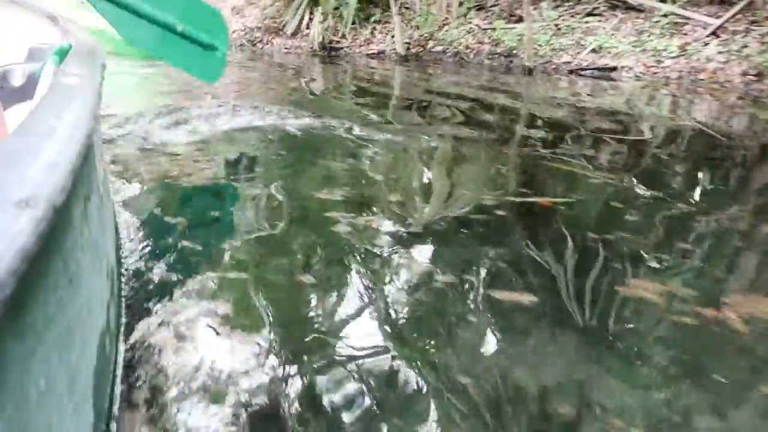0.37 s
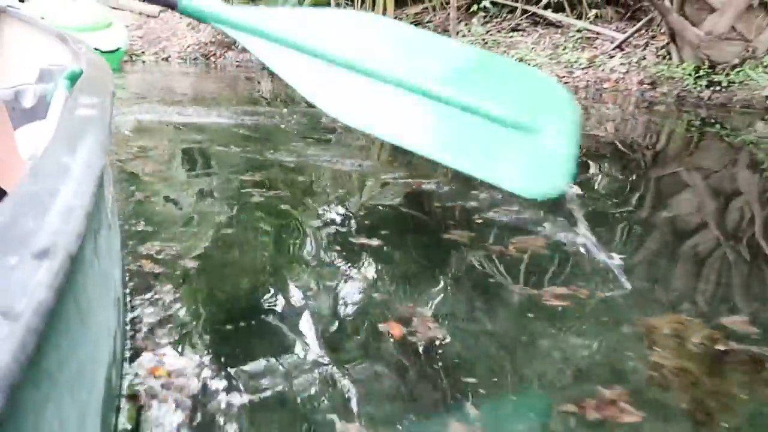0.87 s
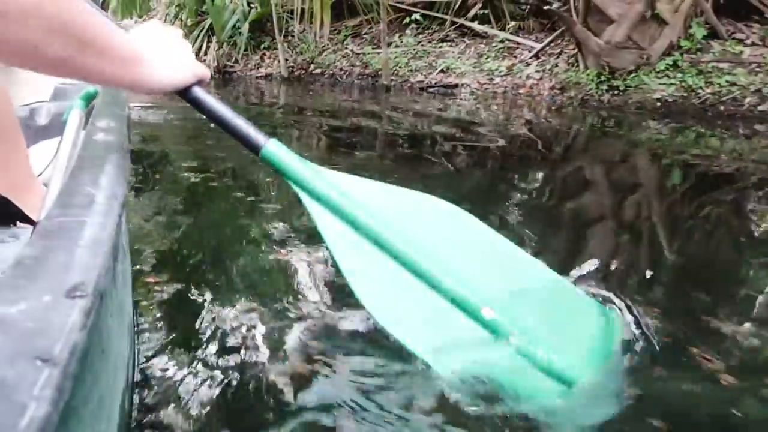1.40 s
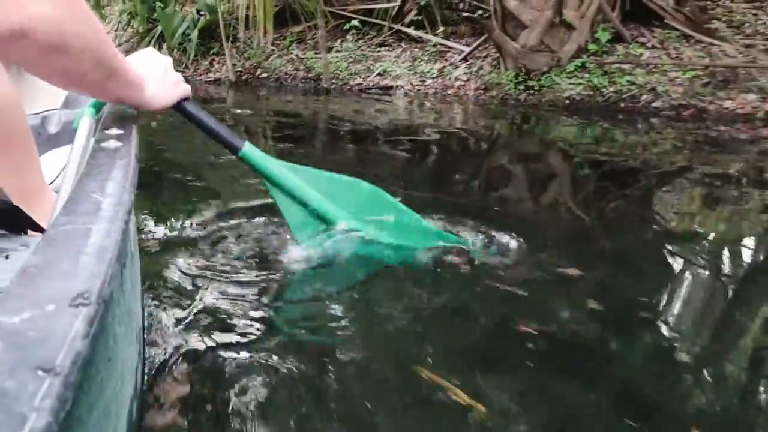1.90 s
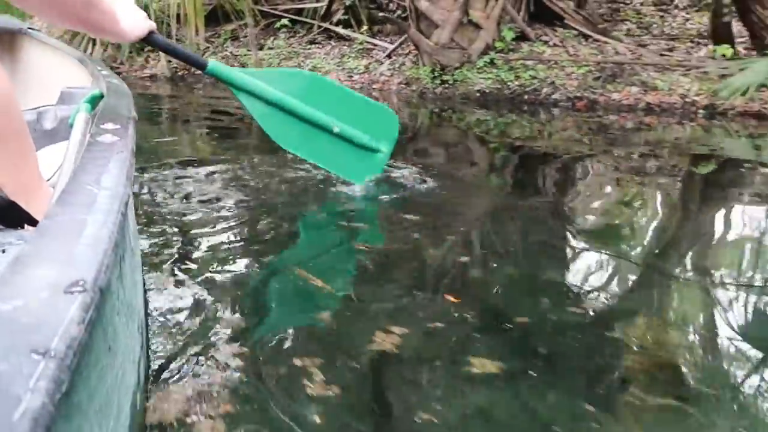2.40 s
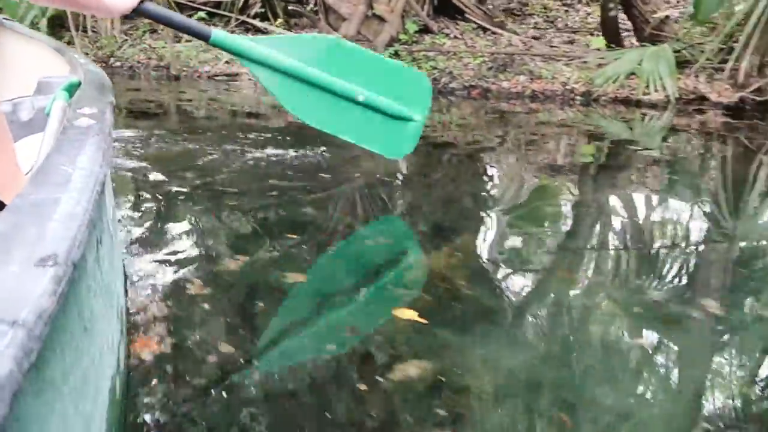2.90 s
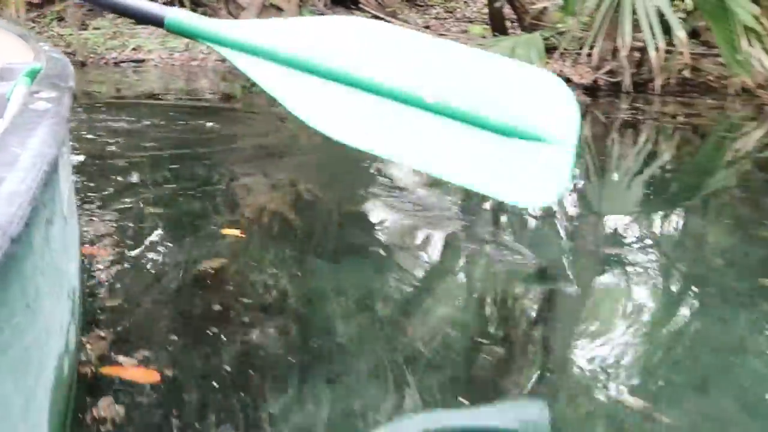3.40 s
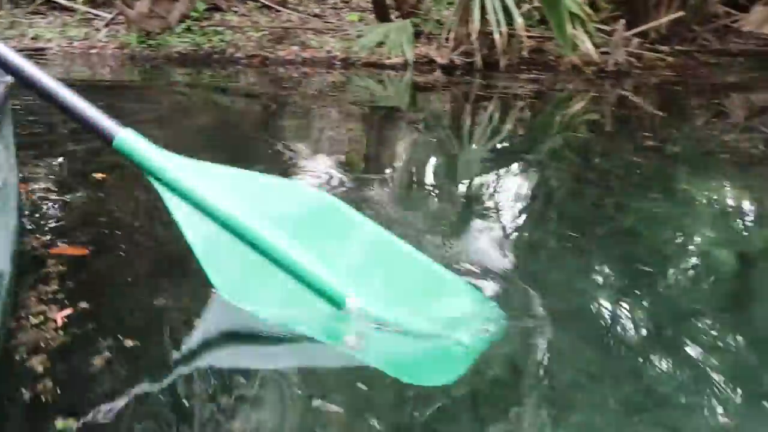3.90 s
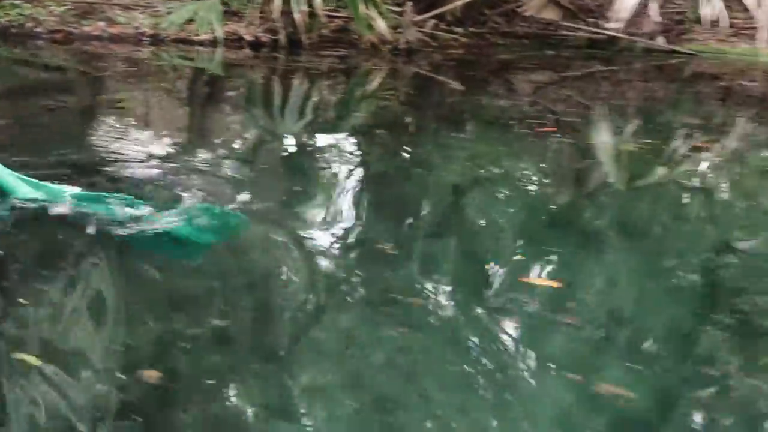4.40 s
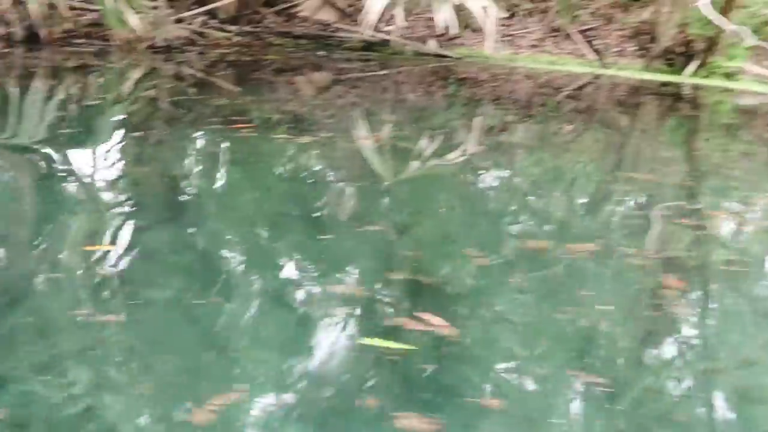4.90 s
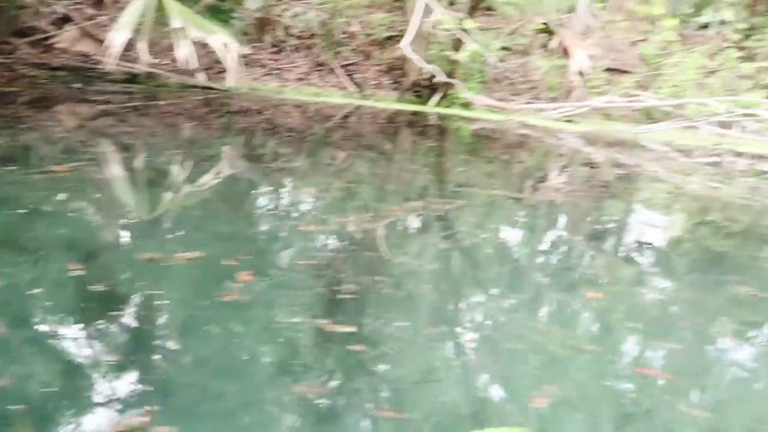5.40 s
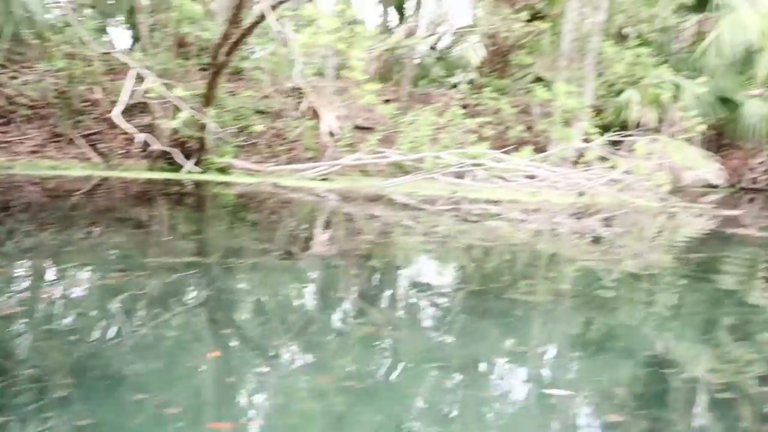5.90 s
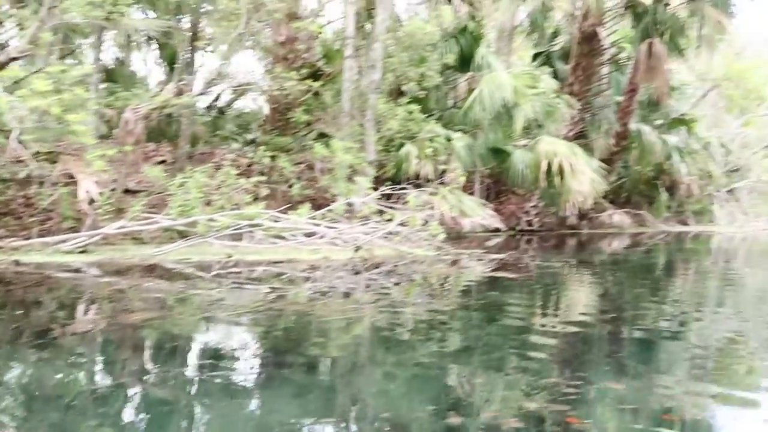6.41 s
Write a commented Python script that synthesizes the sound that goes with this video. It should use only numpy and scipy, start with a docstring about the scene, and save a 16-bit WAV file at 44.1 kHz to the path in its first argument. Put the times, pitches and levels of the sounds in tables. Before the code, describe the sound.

A close stereo scene beside a canoe on a calm wooded river. From 0 to 0.5 s a paddle churns the water: soft wash, low plops, bright drips and spray, with firm hollow hull knocks around 0.2 s. The water thins to sparse drops by 1 s; a dull knock comes at 1.2 s. A very faint high squeak runs from 1.4 to 1.7 s as the next stroke enters with a knock, gurgling most thickly around 1.8 to 2.7 s. A faint bird chip sounds near 2 s. From 2.8 to 4 s it is calmer, with light lapping, low hull rubbing and another chip at 3.7 s. A strong thump at 4.3 s opens a third stroke, busiest with plops at 4.7 to 5.4 s, over bumpy low rumble; a last chip falls near 5.2 s. Splashes fade, then a deep, soft boom at 6.1 s and fading rumble until about 6.5 s.

```python
"""Bubbles and drops ring over a soft wash as a plastic paddle dips and drips in a calm river beside a canoe.
The bubbles are fading sine tones; the wash is shaped noise that swells and sinks. Short pushes and dull noise
make the hollow hull knock and rumble as the paddlers shift. A wet grip squeaks in unsteady overtones, and a
small bird chips in quick upward flicks on the wooded bank, over faint steady noise from the woods.
Two close microphone ports hear it all, with a faint whine of their own."""
import sys
import numpy as np
from scipy import signal
from scipy.fft import rfft, irfft, next_fast_len
from scipy.io import wavfile
from scipy.ndimage import uniform_filter1d, map_coordinates

SR = 44100
rng = np.random.default_rng(int(sys.argv[2]) if len(sys.argv) > 2 else 0)


def file_out(sig):
    """Save sig as 16-bit WAV at sys.argv[1]."""
    # one column per channel
    cols = np.atleast_2d(sig).T
    # limit, then scale
    lim = np.clip(cols, -1, 1)
    pcm = np.round(lim * 32767).astype(np.int16)
    wavfile.write(sys.argv[1], SR, pcm)


def magnitude_from_level(level_db):
    """Linear magnitude for a level in decibels (20 dB per decade)."""
    exponent = np.asarray(level_db, float) / 20
    return 10 ** exponent


N = 288414

# tone colour of the smooth low wash, also used for splashes: pitch_hz [Hz], level_db [dB, relative]
SLOSH_COLOUR = [(150, -50), (250, -0.5), (298, -6), (496, -3), (1090, -7.5), (1410, -12.5), (3280, -31),
                (4000, -35.5), (5200, -64), (8800, -120)]
# bouts of rubbing on the hull as the paddlers shift:
# start_s [s], hold_s [s], boom_db [dB], upper_walls_db [dB]
RUBS = [(0.042, .02, -51, -66), (0.214, 0.064, -29, -20.5), (0.644, 0.078, -43, -71),
        (1.196, 0.0075, -32.5, -25), (1.381, 0.011, -40, -26), (1.548, 0.021, -30, -18.5),
        (1.624, 0.2, -43, -30), (1.867, 0.26, -36.5, -30), (2.679, 0.023, -37.5, -33),
        (2.835, 0.21, -39.5, -42), (3.081, .06, -26, -30), (3.227, 0.39, -35.5, -40),
        (3.762, 0.2, -22.5, -31.5), (4.084, 0.17, -21, -28), (4.262, 0.0093, -28, -17),
        (4.303, .05, -25.5, -41), (4.475, 0.094, -25, -27), (4.628, 0.039, -29, -33.5),
        (4.729, 0.054, -24.5, -30), (4.856, 0.24, -33, -41), (5.048, 0.21, -23.5, -37.5),
        (5.302, 0.086, -21.5, -33), (5.502, 0.14, -23.5, -28), (5.75, .16, -43, -38),
        (5.931, 0.066, -23.5, -35), (6.128, 0.049, -16, -24), (6.27, .12, -33, -34.5),
        (6.42, 0.035, -25.5, -33), (6.477, 0.049, -27, -31.5)]


def unit(x):
    """Scales a sound to an average (rms) strength of 1."""
    return x / np.sqrt(np.mean(x ** 2) + 1e-20)


def along(points, hz):
    """Reads a curve of (Hz, value) points, with pitch on a log axis."""
    point_hz, value = np.transpose(points)
    return np.interp(np.log(hz + 1), np.log(point_hz + 1), value)


def curves(rows):
    """Joins the rows by straight lines: one value per sample for each column after the time."""
    s, *columns = np.transpose(rows)
    return [np.interp(np.arange(N) / SR, s, column) for column in columns]


def wobble(rate):
    """A smooth random curve through rate random points a second."""
    knots = rng.standard_normal(int(N * rate / SR) + 4)
    return map_coordinates(knots, [np.arange(N) * rate / SR])


def filtered(x, response):
    """Multiplies the spectrum of x by a complex response of frequency."""
    size = next_fast_len(N + SR // 2)
    return irfft(rfft(x, size) * response(np.fft.rfftfreq(size, 1 / SR)), size)[..., :N]


def rush(colour, patchy_db):
    """Stereo noise of rms 1: many tiny sounds blur into a hiss, with louder and softer patches."""
    # how alike left and right are: pitch_hz [Hz], likeness [0-1]
    alike = [(250, 0.99), (1000, 0.95), (4000, 0.91), (12000, 1)]
    z = signal.stft(rng.standard_normal((2, N)), nperseg=256)[2]
    patches = uniform_filter1d(rng.standard_normal(z.shape[1:]), size=5, axis=0)  # across pitch
    patches = unit(uniform_filter1d(patches, size=6, axis=1))  # across time
    pair = signal.istft(z * magnitude_from_level(patchy_db * patches), nperseg=256)[1][:, :N]

    def shares(hz):
        """Gains of the middle and side parts: the less alike, the more side."""
        angle = np.arccos(np.clip(along(alike, hz), -1, 1)) / 2
        return magnitude_from_level(along(colour, hz)) * [np.cos(angle), np.sin(angle)]

    mid, side = filtered(pair, shares)
    return unit(np.array([mid + side, mid - side]))


def water():
    """Ringing bubbles and bright snaps lie over swarms of small bubbles and the rush of the flow."""
    # churned water: start_s [s], flow_db [dB, relative], spray_db [dB above the flow]
    wash = [(0.0, -37, -3), (0.25, -33.5, -11.5), (0.5, -38.5, -3.5), (0.78, -46.5, -6.5),
            (1.06, -54.5, 0.5), (1.22, -47, -8), (1.5, -44.5, -7.5), (1.64, -39.5, -8.5), (1.78, -38, -11),
            (1.85, -36, -14), (1.95, -40.5, -6), (2.12, -35.5, -15.5), (2.2, -38.5, -10.5),
            (2.36, -42.5, -11), (2.63, -43.5, -10), (2.69, -45.5, -14.5), (2.9, -49, -3.5),
            (3.2, -43, -6.5), (3.77, -53.5, -2.5), (4.04, -44, -16), (4.68, -43.5, -14),
            (4.74, -36.5, -19.5), (4.95, -40, -5), (5.1, -42, -15.5), (5.5, -39, -18), (5.72, -45.5, -12.5),
            (6.54, -44, -15)]
    strong_flow_db = -31.5
    slosh_db, thrown_db = curves(wash)
    spray_db = slosh_db + thrown_db
    quiet_db = -6.5 * calm()  # fewer decibels of small bubbles between strokes
    # bubbles grow by an extra 0.3 dB for each dB of flow
    froth_db = slosh_db + 0.3 * (slosh_db - strong_flow_db) + quiet_db
    near = bubbles() + snaps()
    near += fizz(froth_db - 2.5, 901.0, spread=0.3514, cycles=11.6, scatter_db=5.0, count=3500, size=900)
    near += fizz(froth_db - 5, 1999, spread=0.408, cycles=11, scatter_db=5, count=2500, size=900)
    around = flow(slosh_db, spray_db) + mist(spray_db - 7.5 + quiet_db)
    # the water moves left with time; weaker flow lies slightly further right
    left_db = -0.0358 * (strong_flow_db - slosh_db) + 0.63 * np.arange(N) / SR
    return (near + magnitude_from_level(-9) * banks(near) + around) * magnitude_from_level([left_db / 2, -left_db / 2])


def bubbles():
    """Trapped air rings at its own pitch; the choppy surface makes the single bubbles flutter."""
    # bubbles and drops that stand out:
    # start_s [s], level_db [dB, relative], pitch_hz [Hz, nominal], life [cycles]
    single = [(0.019, -26.5, 772, 31), (0.07, -33, 733, 11.6), (0.145, -22.5, 610, 38),
              (0.156, -32.5, 2380, 26), (0.181, -17, 1160, 4.7), (0.213, -23.5, 602, 8.9),
              (0.23, -22, 1130, 5.5), (0.233, -22, 3140, 3.3), (0.341, -36, 6800, 5.9),
              (0.392, -27.5, 623, 26.5), (0.459, -33, 4030, 10), (0.527, -33, 4350, 5.5),
              (0.605, -34, 8000, 4), (0.7, -41, 997, 24), (0.772, -39.5, 777, 18),
              (0.772, -25.5, 4500, 0.88), (0.958, -38.5, 5100, 7), (1.006, -31.5, 4750, 5.7),
              (1.029, -36, 1254, 15.7), (1.146, -37, 4350, 2.6), (1.421, -29.5, 593, 7.1),
              (1.517, -38, 4940, 17), (1.496, -39.5, 2110, 18), (1.578, -32.5, 1120, 6),
              (1.607, -30.5, 1930, 7.2), (1.624, -34.5, 2780, 32), (1.682, -34, 8150, 8),
              (1.666, -36, 4140, 10), (1.735, -34, 3100, 11), (1.767, -38, 2760, 8.8),
              (1.807, -32.5, 717, 20), (1.83, -34, 1300, 16), (1.859, -29, 1220, 10),
              (2.083, -28, 1020, 6.9), (2.109, -36, 3290, 21), (1.844, -23, 1055, 5.6),
              (2.09, -24, 2420, 4.9), (2.11, -21.5, 559, 15.8), (2.141, -22.5, 830, 5.9),
              (2.308, -22.5, 1010, 4.2), (2.33, -41, 501, 33), (2.352, -33, 1400, 6.1),
              (2.413, -32, 1144, 14), (2.471, -27.5, 2200, 4.5), (2.472, -36, 469, 24.4),
              (2.477, -28.5, 1273, 8.3), (2.502, -30, 1260, 5.4), (2.538, -32, 1605, 8.5),
              (2.584, -21.5, 2056, 4.6), (2.603, -32.5, 7200, 4.8), (2.652, -42.5, 1526, 39),
              (2.19, -39, 607, 15), (2.238, -34, 1210, 8), (2.26, -41, 730, 12), (2.667, -35.5, 469, 17.4),
              (2.7, -39.5, 640, 24), (2.722, -36, 1100, 5.5), (3.943, -38.5, 1680, 5.8),
              (3.982, -34.5, 4070, 18.6), (4.069, -38, 2300, 15), (4.165, -35, 2630, 6.2),
              (4.209, -33, 2360, 12), (4.259, -27, 4300, 1.8), (4.264, -27.5, 2980, 6.9),
              (4.265, -19.5, 1350, 3.2), (4.337, -31, 1680, 16), (4.382, -30, 2180, 8.2),
              (4.451, -27, 687, 6.9), (4.544, -28.5, 802, 15), (4.582, -30, 5800, 13),
              (4.725, -19.5, 1190, 5.3), (4.741, -15.5, 960, 3.8), (4.758, -29, 477, 18),
              (4.76, -34, 3130, 27), (4.767, -25, 1195, 7.3), (4.784, -23, 1220, 5.7),
              (4.772, -36, 3230, 8.5), (4.826, -35, 1200, 9.7), (4.87, -33, 1960, 8),
              (4.807, -26.5, 3650, 2.3), (4.855, -31, 1260, 16), (4.912, -21, 1510, 4.3),
              (4.913, -22.5, 944, 5.6), (4.915, -28.5, 2490, 13), (4.95, -28.5, 2800, 4.9),
              (4.971, -21, 2690, 2.3), (4.973, -23, 1040, 4.5), (5.012, -28.5, 2790, 9),
              (5.045, -27, 430, 11), (5.139, -28, 2670, 8), (5.139, -31, 3740, 7.7),
              (5.234, -35, 2920, 4.6), (5.284, -33, 1430, 6.3), (5.302, -23.5, 2010, 3.5),
              (5.381, -29, 967, 11.6), (5.416, -35.5, 2830, 14), (6.127, -27, 875, 3.2)]
    s, db, hz, cycles = np.transpose(single)
    # long-lived bubbles climb furthest in pitch
    tones = ring(s, db + 4.5, hz, cycles, rise=0.007 * cycles.reshape(-1, 1), size=2400)
    return tones * magnitude_from_level(4.3 * wobble(220))


def snaps():
    """Bursting spray makes very short, high rings."""
    # bright snaps: start_s [s], level_db [dB, relative]
    bursts = [(0.061, -42), (0.1125, -27.5), (0.202, -34.5), (0.338, -50), (0.418, -39), (0.439, -34.5),
              (0.476, -37.5), (0.604, -38.5), (1.035, -38), (1.07, -42), (1.286, -40), (1.647, -46),
              (1.6466, -34), (1.6807, -34), (1.7818, -38), (2.296, -40), (2.324, -41), (2.354, -42.5),
              (2.603, -44), (3.721, -47), (3.804, -42.5), (4.2635, -40.5), (4.579, -38), (4.8074, -54),
              (4.903, -41), (4.9881, -60)]
    s, db = np.transpose(bursts)
    hz = rng.uniform(8700, 10000, len(s))
    return ring(s, db + 13.5, hz, np.full(len(s), 2.2), rise=0.69, size=64)


def ring(s, db, hz, cycles, rise, size):
    """Fading sines whose pitch climbs as each bubble nears the surface, then holds; size in samples."""
    t = np.arange(size) / SR
    age = t * (hz / np.maximum(cycles, 1))[:, None]  # 1 = one life
    swell = (1 - np.exp(-age / 0.052)) * np.exp(-1.6 * age ** 0.87)
    climb = 1 - rise / 2 + rise / 2 * np.minimum(age, 2)
    tones = magnitude_from_level(db)[:, None] * swell * np.sin(2 * np.pi * hz[:, None] * t * climb)
    at = np.round(s * SR).astype(int)[:, None] + np.arange(size)
    return np.bincount(at.ravel(), tones.ravel(), N + size)[:N]


def fizz(level_db, hz, spread, cycles, scatter_db, count, size):
    """A swarm of small random bubbles around one pitch, whose loudness follows level_db."""
    when, pitch, life, loud = rng.random((count, 4)).T
    pitch = hz * np.exp(spread * np.log(pitch / (1 - pitch)))
    pitch = np.clip(pitch, 200, 14000)
    big_db = scatter_db * np.minimum(-np.log(loud), 2.6)  # a few are much louder
    swarm = ring(when * N / SR, big_db, pitch, cycles * (0.5 + life), rise=0.098, size=size)
    return magnitude_from_level(level_db) * unit(swarm)


def flow(slosh_db, spray_db):
    """Low slosh and bright spray are two rushes of noise that gush together."""
    # tone colour of the spray: pitch_hz [Hz], level_db [dB, relative]
    spray_colour = [(880, -44.5), (1500, -4), (1780, -5.5), (2180, -6.5), (3310, -11), (3670, -12),
                    (12300, -26), (15000, -36.5)]
    gush_db = 1.8 * wobble(19)
    slosh_gain = magnitude_from_level(slosh_db - 2.0 + gush_db + 0.55 * wobble(4.9))
    spray_gain = magnitude_from_level(spray_db - 3.0 + gush_db + 0.27 * wobble(14))
    slosh = slosh_gain * rush(SLOSH_COLOUR, patchy_db=4.5)
    return slosh + spray_gain * rush(spray_colour, patchy_db=4.5)


def mist(level_db):
    """Fine droplets fall on both sides as tiny rings, each port hearing its own."""
    return np.array([fizz(level_db, 3740, spread=0.33, cycles=3.7, scatter_db=3.5, count=6000, size=240)
                     for _ in "LR"])


def calm():
    """0 while the blade churns the water, 1 between strokes, with soft edges."""
    # strokes of the paddle: in_s [s], out_s [s]
    strokes = [(0, .46), (1.52, 2.32), (2.65, 2.76), (4.04, 5.44)]
    t = np.arange(N) / SR
    churning = sum((t >= a) & (t < b) for a, b in strokes)
    return uniform_filter1d(1.0 - churning, size=3000)


def hull():
    """The hollow walls resonate: rubbing and lapping make them rumble, and knocks make them thump."""
    # hull resonances: pitch_hz [Hz], width_hz [Hz], level_db [dB, relative]
    modes = [(56.2, 18.3, -7.5), (77.4, 24, -0.5), (99, 27.2, -0.5), (155.4, 30.2, 7.5), (171.7, 30.6, 7),
             (218.7, 20.6, 0.5), (262.1, 21.4, -1), (306.2, 45.3, -5.5), (430, 66, -8.5), (566, 33, -9),
             (793, 87, -12)]
    boom_db, upper_db = np.transpose(RUBS)[2:]
    # the resting levels are water lapping on the idle hull
    boom_gain = bouts(boom_db, fall_db_per_s=100, rest_db=-45.5)
    upper_gain = bouts(upper_db, fall_db_per_s=124.5, rest_db=-60.5)
    boom = boom_gain * rubbed(modes[:3], lumpy_db=2.0, even=0.75)
    upper = upper_gain * rubbed(modes[3:], lumpy_db=5.0, even=1.0)
    return boom + upper + knocks(modes)


def knocks(modes):
    """Each knock pushes the wall in and lets it spring back; the struck wall throws a short rough splash."""
    # knocks on the hull: start_s [s], level_db [dB, relative], contact_ms [ms]
    hits = [(0.198, -3.5, 3.4), (0.235, 1, 2.68), (0.26, -21, 5.2), (1.182, -8, 1.8), (1.232, -16.5, 1.95),
            (1.381, -26.5, 2.1), (1.42, -36, 3.7), (1.546, -10.5, 2), (1.564, -13, 2.9), (1.866, -19, 3.4),
            (2.108, -13.5, 2.3), (2.674, -22.5, 1.7), (3.105, -16.5, 4.3), (4.266, -1, 4.54),
            (4.454, -12.5, 2.4), (6.126, -0.5, 16), (6.174, -8, 13), (6.242, -15, 8.4)]
    pushes, slaps = np.zeros(N), np.zeros(N)
    t = np.arange(SR // 50) / SR
    for s, db, ms in hits:
        in_and_out = np.sin(2 * np.pi * np.minimum(t / (ms / 1000), 1))
        pushes[round(s * SR):][:len(t)] += magnitude_from_level(db + 14.0) / ms * in_and_out
        slaps[round(s * SR)] = magnitude_from_level(db - 17.0) / np.sqrt(ms)
    fade = magnitude_from_level(-60 * np.arange(SR // 5) / SR / 0.046)  # 60 dB down in 46 ms
    splash = signal.fftconvolve(slaps, fade)[:N] * rush(SLOSH_COLOUR, patchy_db=2.0)
    return filtered(pushes, walls(modes)) + splash


def walls(modes):
    """Response of a set of hull resonances, with every other one turned upside down."""
    def response(f):
        total = 0
        for k, (hz, width, db) in enumerate(modes):
            total = total + (-1) ** k * magnitude_from_level(db) * 1j * f * width / (hz * hz - f * f + 1j * f * width)
        return total
    return response


def rubbed(modes, lumpy_db, even):
    """Hull walls under a soft, dull, lumpy drive; even (0-1) flattens their slow beating."""
    drive = magnitude_from_level(lumpy_db * wobble(30)) * rng.standard_normal(N)
    x = filtered(drive, lambda f: walls(modes)(f) / (1 + 1j * f / 700) ** 3)
    slow = np.sqrt(np.abs(uniform_filter1d(x * x, size=2200)) + 1e-12)
    return unit(x / slow ** even)


def bouts(level_db, fall_db_per_s, rest_db):
    """Gain of all rubbing bouts: each rises, holds and dies away over the resting level."""
    rise_db_per_s = 701
    s, hold = np.transpose(RUBS)[:2, :, None]
    t = np.arange(0, N, 64) / SR
    rising = rise_db_per_s * np.maximum(s - t, 0)
    falling = fall_db_per_s * np.maximum(t - s - hold, 0)
    power = magnitude_from_level(2 * rest_db) + magnitude_from_level(2 * (level_db[:, None] - rising - falling)).sum(axis=0)
    return np.interp(np.arange(N) / SR, t, np.sqrt(power))


def squeak():
    """A wet grip sticks and slips unsteadily; only the high overtones stand above the water."""
    # course of the squeak: start_s [s], slip_rate_hz [Hz], level_db [dB, relative], tilt_db [dB per overtone]
    slips = [(1.375, 1200, -90, -5), (1.39, 1205, -63, -5), (1.465, 1185, -64, -5), (1.49, 1150, -74, -2),
             (1.53, 1110, -65, 4), (1.66, 1065, -62, 4), (1.72, 1035, -88, 4)]
    # its audible overtones: multiple [times the slip rate], level_db [dB, relative]
    overtones = [(4, -9), (5, -3), (6, 5), (7, -6)]
    hz, db, tilt_db = curves(slips)
    phase = 2 * np.pi * np.cumsum(hz * (1 + 0.008 * wobble(150))) / SR
    tones = sum(magnitude_from_level(level + tilt_db * (k - 5.5)) * np.sin(k * phase) for k, level in overtones)
    return magnitude_from_level(db + 4.0 * wobble(60)) * tones


def bird():
    """Each chip is a tone that flicks quickly upward and rings on among the trees."""
    # bird chips: start_s [s], level_db [dB, relative]
    chips = [(1.968, -48), (3.688, -44), (5.155, -45)]
    out = np.zeros(N)
    t = np.arange(SR // 40) / SR
    hz = 7800 - 2600 * np.exp(-t / 0.006)
    note = np.sin(2 * np.pi * np.cumsum(hz) / SR) * np.hanning(len(t)) ** 0.3
    for s, db in chips:
        out[round(s * SR):][:len(t)] += magnitude_from_level(db) * note
    return magnitude_from_level(-4) * out + banks(out)


def banks(x):
    """The banks answer with a fading noise tail in which each pitch dies at its own speed."""
    # fading of the answer: pitch_hz [Hz], time_s [s to fall by 60 dB]
    echo = [(200, 0.12), (2000, 0.11), (10000, 0.33)]
    hz, t, z = signal.stft(rng.standard_normal((2, SR // 2)), SR, nperseg=256)
    tail = signal.istft(z * magnitude_from_level(-60 * t / along(echo, hz)[:, None]), SR, nperseg=256)[1]
    tail = tail / np.linalg.norm(tail[0])
    late = np.pad(x, (300, 0))[None]  # the answer starts 300 samples late
    return signal.fftconvolve(late, tail, axes=1)[:, :N]


def woods():
    """Faint, mostly low noise from the woods around, made as a steady rush."""
    # tone colour of the woods: pitch_hz [Hz], level_db [dB, relative]
    woods_colour = [(18, -47.5), (30, -5.5), (87, -8), (304, -15.5), (597, -34.5), (662, -30.5),
                    (1560, -43), (2490, -36.5), (11000, -49), (15000, -62.5)]
    return magnitude_from_level(-49.5) * rush(woods_colour, patchy_db=1.2)


def scene():
    """Water beside the boat, the hull under the listener, the woods around."""
    return water() + hull() + squeak() + bird() + woods()


def roll_off(x):
    """The treble ends steeply here."""
    return signal.sosfilt(signal.butter(12, 15700, fs=SR, output="sos"), x)


def record(dry):
    """The ports lie apart, so the treble reaches them out of step; the electronics whine faintly."""
    # lead of the left port over the right: pitch_hz [Hz], lead [radians]
    left_lead = [(300, 0), (1000, .2), (2000, .45), (5000, 1.0), (9000, 1.7), (13000, 1.95)]

    def port_response(hz):
        """Half the lead goes to each port; the sound above 15 kHz is cut steeply."""
        shift = np.exp(0.5j * np.outer([1, -1], along(left_lead, hz)))
        return shift / (1 + (hz / 15000) ** 40)

    ports = filtered(dry, port_response)
    whine = magnitude_from_level(-84.0) * np.sin(2 * np.pi * 13006 * np.arange(N) / SR)
    return roll_off(ports + whine)


dry = scene()
out = record(dry)
file_out(out)
```